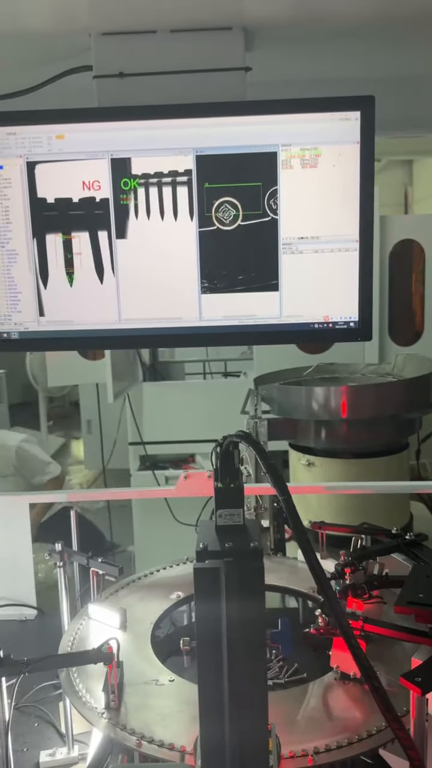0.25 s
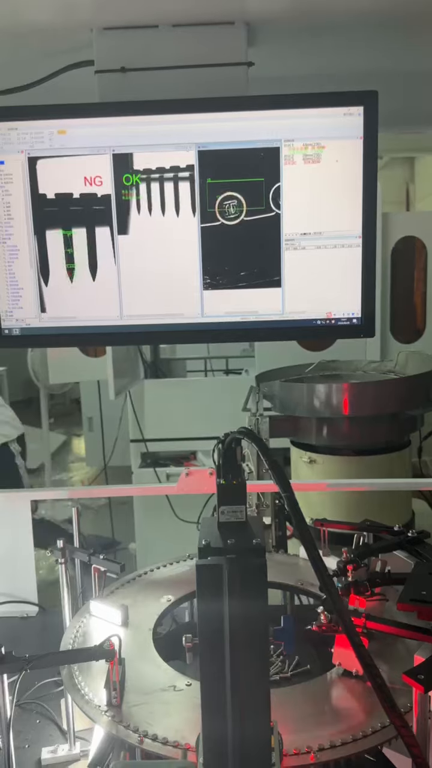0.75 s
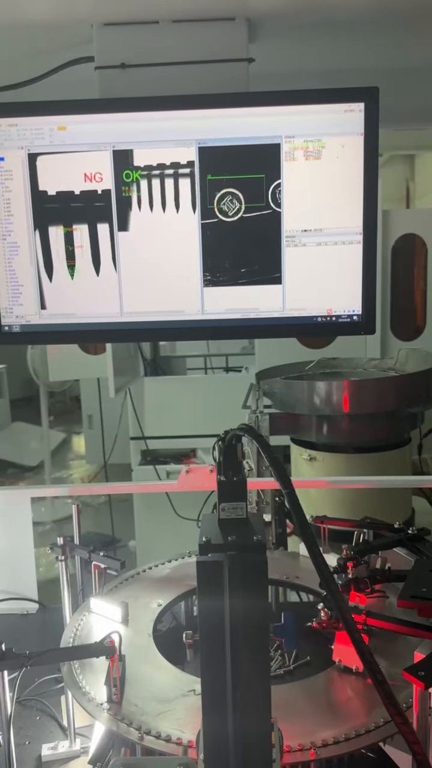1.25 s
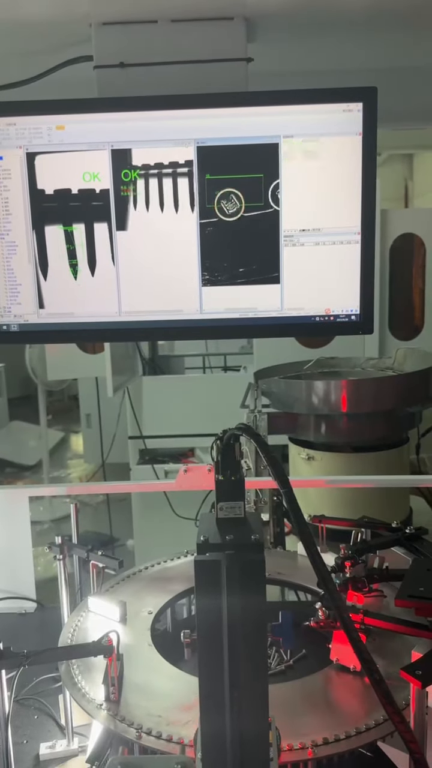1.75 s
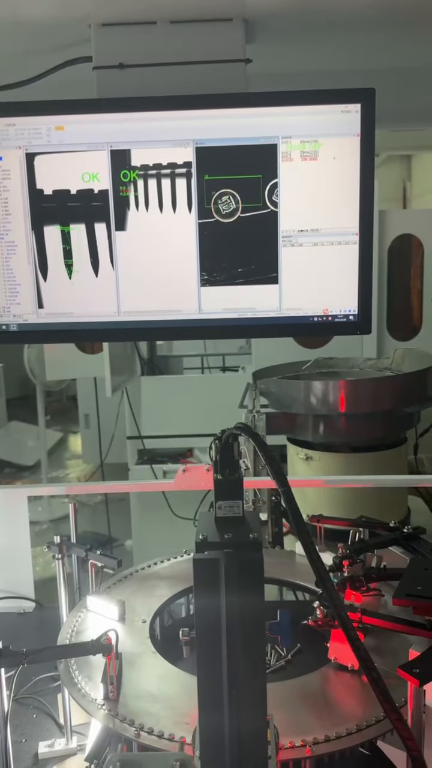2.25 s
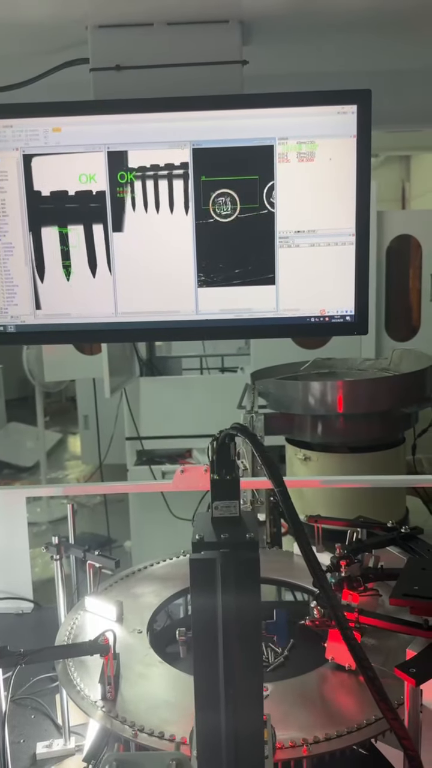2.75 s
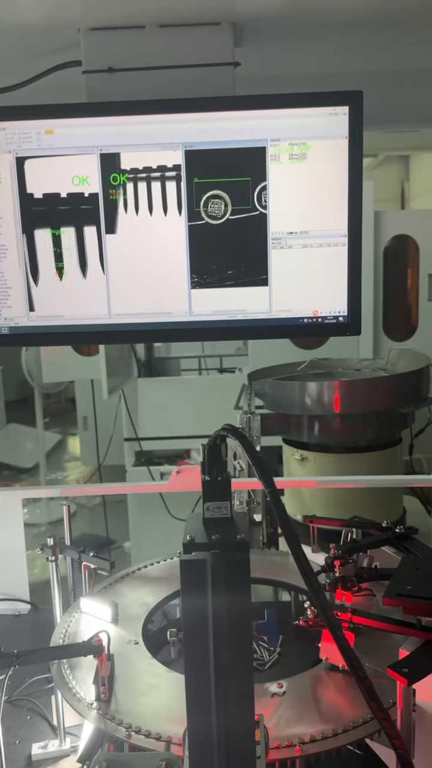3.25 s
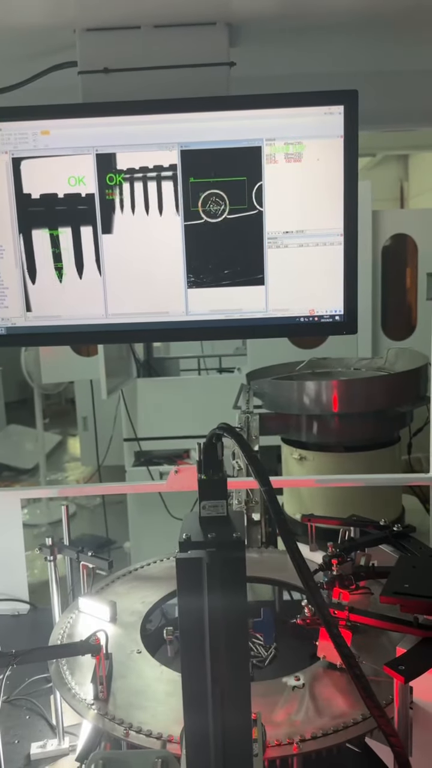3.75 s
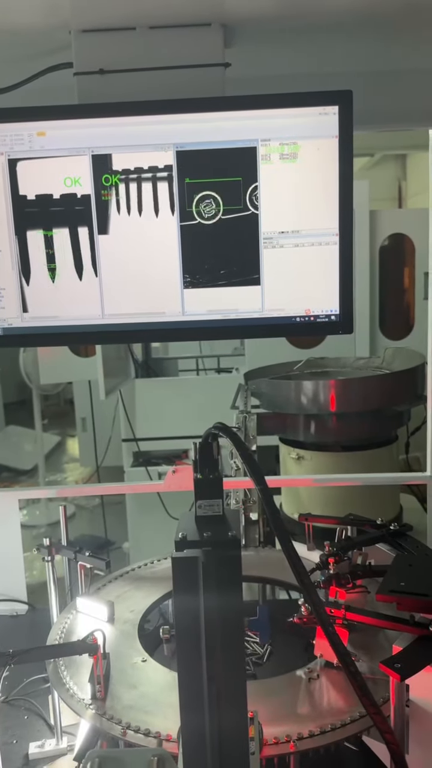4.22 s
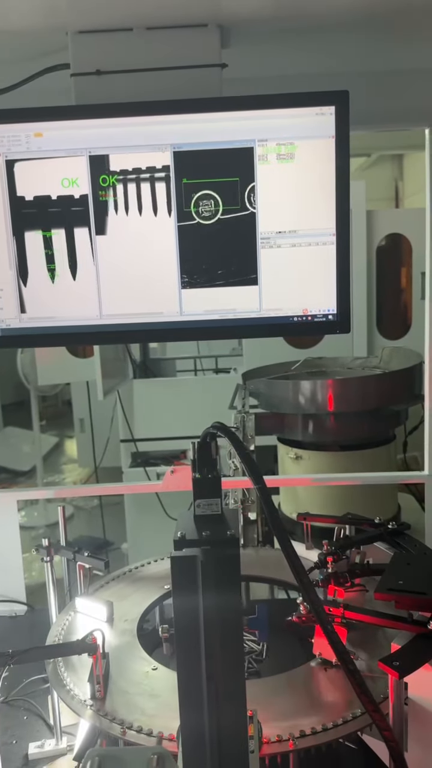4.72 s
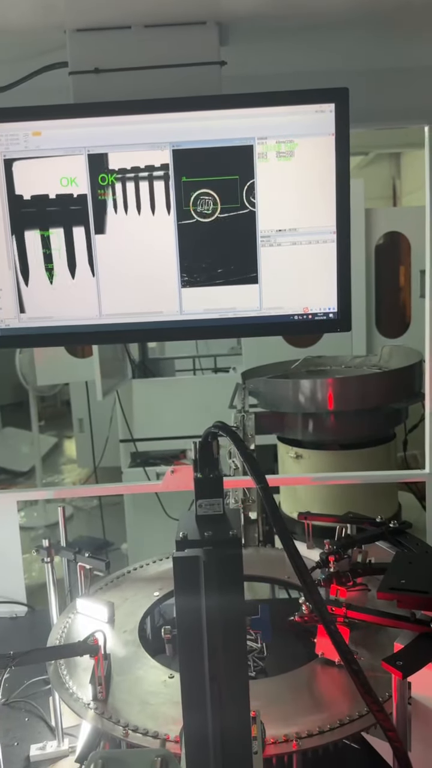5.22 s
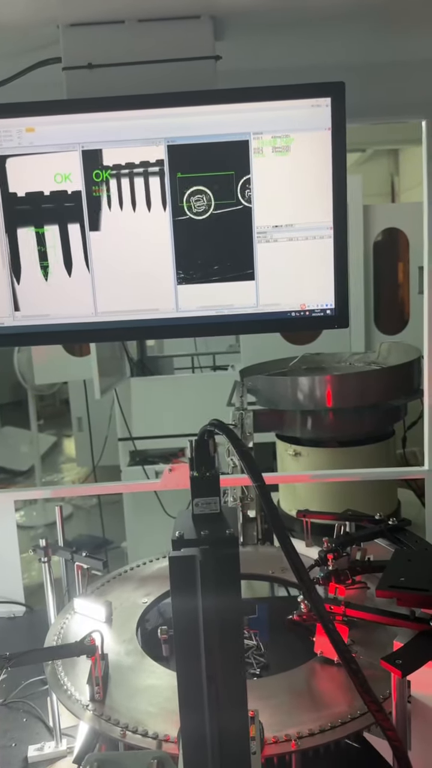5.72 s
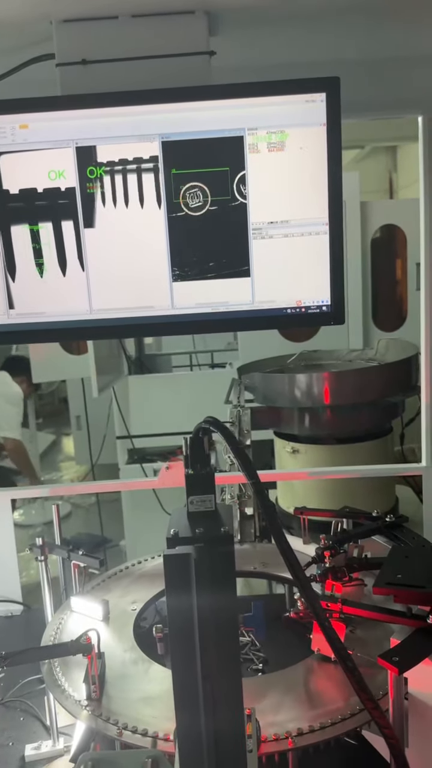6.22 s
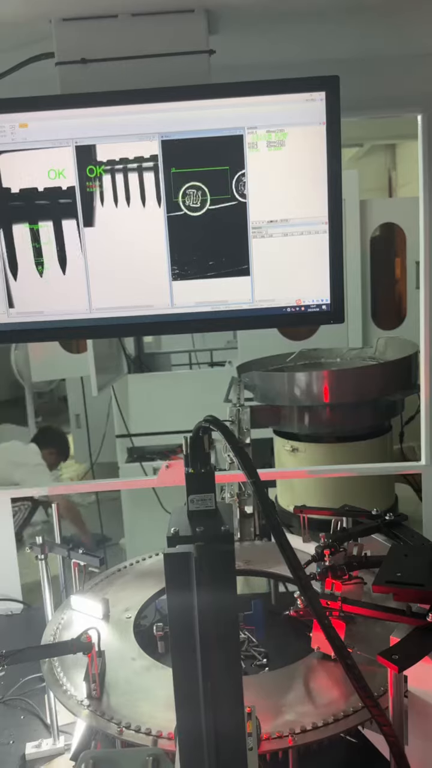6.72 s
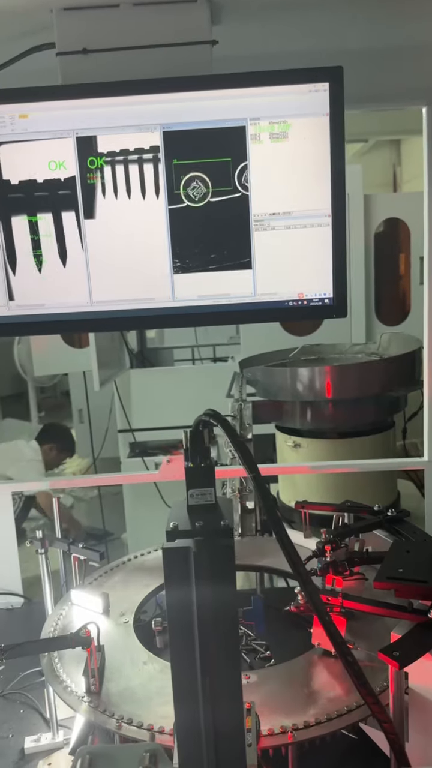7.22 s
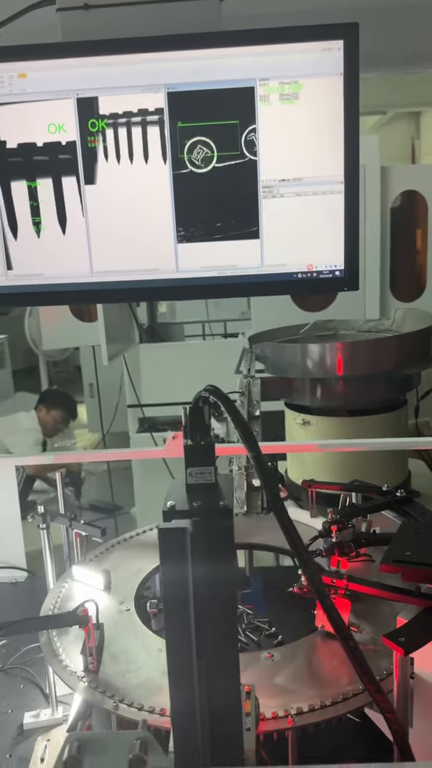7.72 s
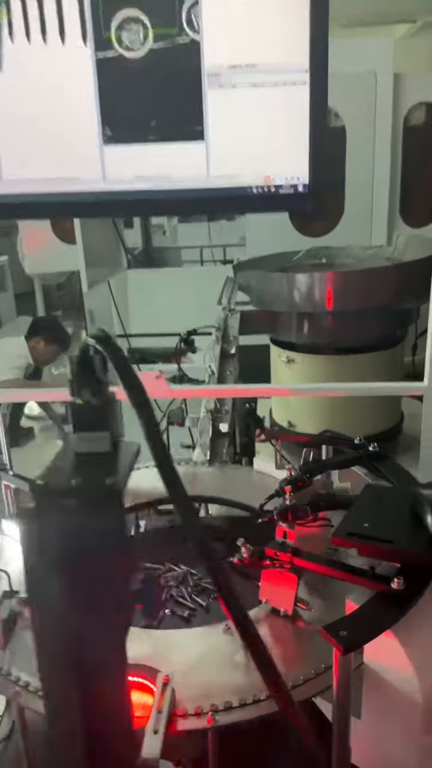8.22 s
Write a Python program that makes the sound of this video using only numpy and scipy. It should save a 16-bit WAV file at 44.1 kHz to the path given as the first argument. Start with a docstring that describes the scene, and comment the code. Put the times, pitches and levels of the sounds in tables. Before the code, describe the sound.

A close stereo sound of a nail sorting machine in a workshop with short reverberation. From 0 s a vibrating feeder bowl gives a deep hum around 60 Hz and dense bright rattle, dying away by about 0.5 s. Nails on the turning steel disc keep jostling with fine ticking, dropping into a chute about 6.6 times a second with tiny rebounds, hard clacks and short ringing notes. Sharp steel snaps stand out at 0.3-0.65, 1.8 and 2.45 s. Around 2.4-2.9 s the bowl surges back, louder, and stays to the end as a thick rattle, while disc ticking recedes. Hollow frame knocks come irregularly, notably near 0.6, 2.4, 3.7-4.2 and 6-7 s. High nail pings sing out at about 5, 6.5 and 8.2 s, where a hard drop lands. Steady airflow and slowly beating motor hum continue underneath, with low drones near 1, 5 and 5.7 s. Disc ticking rises again near 8.4 s.

```python
"""A workshop, close to a nail sorting machine. Nails jostle on a turning steel disc and drop into a chute
6.6 slots a second, with rebounds and hard drops; random contacts make the clatter, damped modes the ringing.
The vibrating feeder bowl dies down in the first half second and returns after two with a deep hum and a
dense rattle, both set by one drive curve. Motor tones and fan noise run throughout; low drones come and go.
"""
import sys
import numpy as np
from scipy import signal
from scipy.fft import rfft, irfft, next_fast_len
from scipy.io import wavfile
from scipy.ndimage import uniform_filter1d, map_coordinates

SR = 44100
rng = np.random.default_rng(int(sys.argv[2]) if len(sys.argv) > 2 else 0)


def unload_audio(sound):
    """Save the sound as a 16-bit wav file, at the path given as the first command line argument."""
    columns = np.transpose(np.atleast_2d(sound))
    # keep every value between -1 and 1, then stretch to whole-number steps
    steps = np.round(np.clip(columns, -1, 1) * 32767)
    wavfile.write(sys.argv[1], SR, steps.astype(np.int16))


N = 373527

# feeder magnet drive: [t/s, relative drive/dB]
FEEDER_DRIVE = [(0, 3), (.18, -1), (.45, -14), (2.3, -10), (2.55, 1.5), (2.9, 4.5)]
# feeder hum, vibration rate first: [f/Hz, level at 0 dB drive/dB]
FEEDER_TONES = [(61, -46.5), (122.2, -76)]
# jostling on the disc: [t/s, relative level/dB]
DISC_LEVEL = [(0, -26.5), (.5, -24), (1.2, -22), (1.8, -22), (2.3, -22.5), (2.8, -28.5), (4.8, -41),
              (7.2, -45), (8.47, -24)]


def amp(db):
    """Decibels to gain."""
    return 10 ** (np.asarray(db) / 20)


def unit(x):
    """Scale to rms 1."""
    return x / np.sqrt(np.mean(x ** 2) + 1e-20)


def along(points, hz):
    """Interpolate [f/Hz, value] points on a log frequency axis."""
    f, v = np.transpose(points)
    return np.interp(np.log(hz + 1), np.log(f + 1), v)


def curve(rows):
    """Interpolate [t/s, value] points at every sample."""
    return np.interp(np.arange(N) / SR, *np.transpose(rows))


def wobble(rate):
    """Smooth random curve, rate knots a second."""
    knots = rng.standard_normal(int(N * rate / SR) + 4)
    coarse = np.arange(0, N, 64)  # spline here, linear in between
    return np.interp(np.arange(N), coarse, map_coordinates(knots, [coarse * rate / SR]))


def filtered(x, response):
    """Filter x by a response given as a function of f/Hz."""
    m = next_fast_len(N + SR // 4, True)
    spectrum = rfft(x, m) * response(np.fft.rfftfreq(m, 1 / SR))
    return irfft(spectrum, m)[..., :N]


def coloured(x, spectrum):
    """Shape white x by a [f/Hz, dB] spectrum, keeping its power."""
    return filtered(x, lambda hz: unit(amp(along(spectrum, hz))))


def contacts(rate, spread_db):
    """Random tiny impacts, rms 1, each with its own size and mid/side share."""
    at = np.flatnonzero(rng.random(N) < rate / SR)
    size = rng.standard_normal(N)[at]
    place = 2 * np.pi * rng.random(N)[at]
    out = np.zeros((2, N))
    out[:, at] = amp(spread_db * size) * [np.cos(place), np.sin(place)]
    return unit(out)


def ringing(x, modes):
    """Damped [f/Hz, level/dB, width/Hz] resonances; white x of rms 1 drives each to its listed level."""
    def response(f):
        total = 0
        for centre, db, width in modes:
            resonance = 1j * f * width / (centre * centre - f * f + 1j * f * width)
            total = total + amp(db) * np.sqrt(SR / np.pi / width) * resonance
        return total
    return filtered(x, response)


def bursts(rows, t60):
    """Envelope of (t/s, level/dB, rise/s) bursts that swell and decay; their powers add."""
    power, t = np.zeros(N + SR), np.arange(SR // 2) / SR
    for s, db, rise in rows:
        swell = np.minimum(t / max(rise, 1 / SR), 1) ** .75
        shape = swell * amp(db - 60 * np.maximum(t - rise, 0) / t60)
        power[max(round(s * SR), 0):][:len(t)] += shape ** 2
    return np.sqrt(power[:N])


def tones(lines, drift_hz):
    """Sines of [f/Hz, rms/dB] whose pitch drifts slightly."""
    out = 0
    for hz, db in lines:
        phase = 2 * np.pi * np.cumsum(hz + drift_hz * wobble(2.06)) / SR
        out = out + amp(db) * np.sqrt(2) * np.sin(phase)
    return out


def mode(hz, unrest, rate=22):
    """One mode with a wandering phase (unrest/rad), as a mid/side pair in quadrature."""
    phase = 2 * np.pi * hz * np.arange(N) / SR + unrest * wobble(rate)
    return np.array([np.sin(phase), np.cos(phase)])


def struck(blows, modes, t60, spread_db):
    """Each (t/s, level/dB) blow rings the modes afresh, in its own random mix and direction."""
    hz, db = np.transpose(modes)
    t = np.arange(SR // 3) / SR
    fade = amp(-60 * t / t60) * (1 - np.exp(-t / .002))
    rings = np.exp(2j * np.pi * hz[:, None] * t) * fade
    luck = rng.standard_normal((len(blows), 5, len(hz)))
    weights = amp(db + spread_db * luck[:, -1:]) * (luck[:, :2] + 1j * luck[:, 2:-1])
    notes = (weights.reshape(-1, len(hz)) @ rings).real.reshape(len(blows), 2, -1)
    out = np.zeros((2, N + SR))
    for (s, blow_db), note in zip(blows, notes):
        out[:, max(round(s * SR), 0):][:, :len(t)] += amp(blow_db) * note
    return out[:, :N]


def jingling(x, depth_db):
    """Nails favour their own pitches for a few hundredths of a second: narrow patches of bounded gain."""
    full_depth_from_hz = 3000
    hz, _, z = signal.stft(x, SR, nperseg=768)
    reach = np.minimum(hz / full_depth_from_hz, 1)[:, None]
    field = uniform_filter1d(rng.standard_normal(z.shape[1:]), size=2, axis=0)
    field = uniform_filter1d(field, size=5, axis=1)
    gain = unit(amp(reach * depth_db * np.tanh(unit(field) / 2)))
    return signal.istft(z * gain, nperseg=768)[1][:, :N]


def room(x):
    """Diffuse reverberation; treble dies first; a fresh noise tail every eighth of a second keeps it even."""
    # decay time: [f/Hz, t60/s]
    decay_times = [(200, .55), (2000, .32), (8000, .12), (15000, .06)]
    out, step = np.zeros((2, N + SR)), SR // 8
    for start in range(0, N, step):
        hz, t, z = signal.stft(rng.standard_normal((2, SR // 3)), SR, nperseg=256)
        decay = amp(-60 * t / along(decay_times, hz)[:, None])
        tail = signal.istft(z * decay, SR, nperseg=256)[1]
        wet = signal.fftconvolve(x[:, start:start + step], tail / np.linalg.norm(tail[0]), axes=1)
        out[:, start:start + wet.shape[1]] += wet
    return out[:, :N]


def stereo(pair):
    """Mid/side to left/right, power kept: bass centred, side share set by frequency."""
    # width: [f/Hz, side re mid/dB]
    side_balance = [(60, -45), (210, -26), (330, -18), (520, -4), (770, -3.5), (1100, -12), (1800, -17),
                    (2150, -12), (2700, -5), (6400, -4), (8000, 1.5), (9500, 5), (10700, 24), (13600, 24),
                    (14700, 5.5)]

    def shares(hz):
        side = amp(along(side_balance, hz))
        return np.array([np.ones_like(side), side]) / np.hypot(1, side)
    mid, side = filtered(pair, shares)
    return np.array([mid + side, mid - side])


def fans():
    """Fan airflow: steady coloured noise."""
    # fan spectrum: [f/Hz, relative density/dB]
    fan_spectrum = [(20, -20), (40, -6), (70, -2), (140, 1.5), (220, -1.5), (330, -1), (520, -5.5),
                    (800, -6.5), (1400, -3.5), (4000, -3.5), (15000, -50)]
    return amp(-40.0) * coloured(rng.standard_normal((2, N)), fan_spectrum)


def hum():
    """Feeder magnet hum, two motors beating slowly and passing drones, alike at both ears."""
    # motor tones: [f/Hz, rms/dB]
    motor_tones = [(48.9, -57), (50.55, -51), (100, -64), (120, -62)]
    # low drones that come and go: [start/s, end/s, f/Hz, rms/dB]
    drone_rows = [(.72, 1.55, 75, -51.5), (1.8, 2.45, 75, -65), (4.92, 5.298, 74, -52), (5.4, 5.9, 76, -51),
                  (5.62, 5.898, 123.5, -49)]
    out = amp(curve(FEEDER_DRIVE)) * tones(FEEDER_TONES, drift_hz=0.068)
    for start, end, hz, db in drone_rows:
        swell = curve([(start - .05, 0), (start + .05, 1), (end - .05, 1), (end + .05, 0)])
        out = out + swell * tones([(hz, db)], drift_hz=0.31)
    return out + tones(motor_tones, drift_hz=0.31)


def knocks():
    """Hollow frame knocks: quickly damped bursts of band noise, each around its own pitch."""
    # knocks: [t/s, f/Hz, level/dB]
    knock_rows = [(.574, 900, -37), (1.365, 800, -44), (1.44, 750, -43), (2.125, 800, -44),
                  (2.37, 950, -36), (2.41, 450, -41), (3.675, 730, -38), (3.82, 750, -39),
                  (4.06, 1080, -38), (4.165, 1000, -36), (4.76, 850, -39), (5.955, 790, -39),
                  (6.52, 680, -38), (6.86, 880, -39)]
    rise_s, t60_s, relative_width = .006, .2, .7
    out = 0
    for s, hz, db in knock_rows:
        b, a = signal.iirpeak(hz, 1 / relative_width, SR)
        body = unit(signal.lfilter(b, a, rng.standard_normal((2, N))))
        out = out + bursts([(s, db, rise_s)], t60=t60_s) * body
    return out


def bowl(level_db, throb):
    """The bowl tosses its nails once per vibration and they ring its wall; more drive, more level."""
    # rattle spectrum: [f/Hz, relative density/dB]
    rattle_spectrum = [(150, -28), (370, -15), (520, -20), (650, -14), (800, -12.5), (1000, -11.5),
                       (1300, -12), (2800, -5.5), (3800, -4.2), (4700, -6.8), (6000, -1.8), (7300, 0),
                       (8400, -3.5), (9500, -2.5), (12700, -11), (14800, -1.5), (15700, -10)]
    # bowl wall modes: [f/Hz, relative level/dB, width/Hz]
    wall_modes = [(369, -41.5, 23), (628, -37, 22), (1187, -27.5, 35), (2787, -20.5, 40), (3855, -21, 120),
                  (4104, -24, 50), (7470, -27.5, 120)]
    toss = 1 + throb * np.sin(2 * np.pi * FEEDER_TONES[0][0] * np.arange(N) / SR)
    level = amp(level_db + curve(FEEDER_DRIVE) + 0.5 * wobble(14)) * toss
    rattle = coloured(level * contacts(rate=7000, spread_db=2), rattle_spectrum)
    wall = ringing(level * contacts(rate=2000, spread_db=-1.5), wall_modes)
    return jingling(rattle + wall, depth_db=6.5)


def disc():
    """Nails tick against each other and the disc rim: dense random contacts, coloured."""
    # ticking spectrum: [f/Hz, relative density/dB]
    tick_spectrum = [(400, -23), (1000, -12), (1500, -7), (2300, 1.5), (3100, -10), (3700, 3.5), (4500, -2),
                     (6800, 5), (8400, 1), (9500, 4), (12400, -4), (14800, 4), (15700, -3)]
    level = amp(curve(DISC_LEVEL) + 0.8 * wobble(22))
    return coloured(amp(-5.2) * level * contacts(rate=6000, spread_db=2), tick_spectrum)


def taps(bowl_db):
    """Rows (t/s, level/dB): stray nails tap the steel at random, as hard as disc and bowl shake them."""
    taps_per_s, tap_db, spread_db = 45, -10.5, 4.2  # tap_db is relative to the bed
    bed_power = amp(curve(DISC_LEVEL)) ** 2 + amp(bowl_db + curve(FEEDER_DRIVE)) ** 2
    bed_db = 10 * np.log10(bed_power)
    at = np.flatnonzero(rng.random(N) < taps_per_s / SR)
    level_db = bed_db[at] + tap_db + spread_db * rng.standard_normal(len(at))
    return list(zip(at / SR, level_db))


def snaps(t60):
    """Hard steel-on-steel hits: short bright noise bursts."""
    # snaps: [t/s, relative level/dB]
    snap_rows = [(.341, -18), (.485, -16.5), (.643, -18.5), (1.782, -19.5), (2.002, -28), (2.456, -23),
                 (6.172, -23), (8.36, -21.5)]
    # snap spectrum: [f/Hz, relative density/dB]
    snap_spectrum = [(1500, -24), (4000, -12), (7000, -5), (10000, -2), (12000, -2), (14500, 0),
                     (16000, -4)]
    snap = bursts([(s, db, .002) for s, db in snap_rows], t60=t60)
    return coloured(np.sqrt(2) * snap * rng.standard_normal((2, N)), snap_spectrum)


def free_nails(unrest):
    """A nail that bounces clear rings on one high, wavering, decaying note."""
    # free rings: [t/s, f/Hz, relative level/dB, t60/s]
    ring_rows = [(.342, 6480, -27, .2), (.4, 7214, -31, .2), (.485, 9850, -23, .06),
                 (.485, 10150, -23, .06), (.58, 7946, -31, .2), (.643, 6600, -30, .16),
                 (1.5, 7429, -29, .2), (1.5, 9281, -30, .15), (1.655, 7946, -29, .2), (2.03, 6804, -27, .2),
                 (2.245, 7257, -29, .2), (2.32, 6804, -29, .2), (3.472, 7946, -27, .2),
                 (4.957, 7429, -22.5, .2), (5.575, 6481, -26, .2), (5.892, 5965, -28, .2),
                 (6.028, 6481, -27, .2), (6.34, 5040, -31, .3), (6.503, 7429, -25, .2),
                 (7.845, 7494, -25, .2), (8.208, 6660, -19.5, .16), (8.362, 10680, -25, .16),
                 (8.37, 6680, -26, .16)]
    out, t = np.zeros((2, N + SR)), np.arange(SR // 3) / SR
    for s, hz, db, t60 in ring_rows:
        phase = 2 * np.pi * hz * t + unrest * wobble(170)[:len(t)]
        fade = amp(db - 60 * t / t60) * (1 - np.exp(-t / .001))
        note = np.array([np.sin(phase), np.cos(phase)])
        out[:, round(s * SR):][:, :len(t)] += np.sqrt(2) * fade * note
    return out[:, :N]


def landings():
    """Rows (t/s, clatter/dB, rise/s, chute/dB): slots drop nails that rebound; hard drops replace near ones."""
    # hard drops: [t/s, relative clatter/dB, relative chute ring/dB]
    hard_rows = [(0.066, -24, -54), (.12, -24, -41), (.201, -28.5, -48), (0.282, -23.5, -42),
                 (.397, -23, -48), (.575, -22, -43), (0.718, -23.5, -43), (.742, -25, -50),
                 (.874, -23, -41.5), (.945, -28.5, -51), (1.015, -26, -59), (1.057, -24.5, -51),
                 (1.12, -29, -52), (1.19, -23.5, -39), (1.261, -21, -43), (1.341, -24, -44),
                 (1.404, -25, -48), (1.496, -21, -44), (1.555, -29, -50), (1.647, -25, -40),
                 (1.715, -27, -50), (1.852, -25.5, -40), (1.939, -21, -40), (2.021, -22.5, -45),
                 (2.082, -20.5, -41), (2.165, -26.5, -49), (2.236, -21, -42), (2.314, -23.5, -58),
                 (2.39, -23.5, -39), (2.452, -20.5, -55), (2.551, -27.5, -37), (2.705, -22, -40.5),
                 (2.766, -25.5, -50), (2.888, -22.5, -44), (3.005, -21.5, -36.5), (3.157, -25.5, -51),
                 (3.302, -21, -46), (3.469, -22.5, -38), (3.633, -21, -55), (3.78, -26, -45),
                 (3.927, -23, -46), (4.06, -25, -48), (4.226, -22, -41.5), (4.372, -25.5, -40),
                 (4.505, -31, -43), (4.606, -23.5, -46), (4.73, -26, -50), (4.826, -20.5, -48),
                 (4.895, -23, -48), (4.954, -25, -48), (5.142, -25, -38.5), (5.281, -31, -42),
                 (5.371, -27.5, -50.5), (5.428, -25, -41), (5.573, -21.5, -42), (5.73, -27.5, -38),
                 (5.888, -21.5, -33), (6.026, -23.5, -35.5), (6.174, -33, -44), (6.344, -25, -36),
                 (6.501, -24, -38.5), (6.639, -31, -41), (6.77, -21, -50.5), (6.942, -22.5, -37),
                 (7.073, -22, -48), (7.225, -23.5, -47), (7.392, -22, -55), (7.572, -22, -50),
                 (7.697, -20, -44), (7.841, -21.5, -49), (7.99, -22, -44), (8.171, -18, -47.5),
                 (8.361, -25, -46), (8.448, -22, -46)]
    slots_per_s, first_slot_s = 6.6, .112
    drop_db, chute_db, hard_rise_s = -33.5, -46.5, 0.007
    scatter_s, scatter_db = 0.0077, 1
    # first landing and rebound: lag/s, clatter/dB, chute/dB, rise/s, scatter factor
    strikes = [(0, 0, 0, 0.011, 1), (.07, -6, -3.5, 0.0068, 2.3)]
    slots = np.arange(first_slot_s, N / SR, 1 / slots_per_s)
    chance = rng.standard_normal((len(slots), 2, 2))
    rows = [(s, db, hard_rise_s, chute_ring_db) for s, db, chute_ring_db in hard_rows]
    hard_s = np.array(hard_rows)[:, 0]
    for slot, draws in zip(slots, chance):
        for (lag, softer, duller, rise, scatter), (late, size) in zip(strikes, draws):
            s = slot + lag + scatter * scatter_s * late
            db = scatter * scatter_db * size
            if np.abs(hard_s - slot - lag).min() > .3 / slots_per_s:
                rows.append((s, drop_db + softer + db, rise, chute_db + duller + db))
    return rows


def flurries(falls):
    """Strike envelope of the falling nails."""
    return bursts([(s, db, rise) for s, db, rise, _ in falls], t60=0.15)


def drops(strike):
    """Each drop is a quick flurry of contacts under the strike envelope."""
    # drop spectrum: [f/Hz, relative density/dB]
    drop_spectrum = [(500, -30), (1400, -19), (2400, -11), (3700, -6), (4800, -7), (6200, -1.5), (7700, -1),
                     (8500, -4), (9400, -1), (10600, -3), (12300, -8), (15500, -9)]
    return coloured(amp(2.6) * strike * contacts(rate=16000, spread_db=0), drop_spectrum)


def singing_modes(falls, unrest, flutter_db):
    """Every drop swells the disc's clearest modes; a nail catching an edge makes one sing out."""
    # clearest disc modes: [f/Hz, level re drop clatter/dB]
    singer_rows = [(1100, -25.5), (1890, -40), (2132, -18), (2522, -16.5), (2959, -23.5), (3225, -29),
                   (3537, -30), (4019, -23), (5641, -19)]
    # nails catching an edge: [t/s, mode f/Hz, relative level/dB]
    ping_rows = [(.01, 2522, -32), (.1, 2132, -29.5), (.13, 2522, -30), (.27, 4019, -30), (.43, 1100, -42),
                 (.77, 1100, -52), (.89, 2132, -33), (1.0, 1100, -45), (1.17, 2522, -35), (1.33, 2132, -33),
                 (1.52, 2132, -32), (1.66, 2132, -31), (1.8, 2132, -33), (1.95, 2132, -34),
                 (2.01, 1100, -34.5), (2.23, 2132, -35), (2.36, 4019, -29), (2.38, 2132, -33),
                 (2.39, 1100, -45), (2.53, 2132, -33), (2.65, 4019, -33), (.58, 5641, -33),
                 (1.35, 5641, -32), (2.69, 5641, -28.5), (2.87, 2132, -34), (2.98, 2132, -28),
                 (3.28, 4019, -33), (3.29, 2132, -29), (3.44, 2522, -30), (3.62, 2132, -44),
                 (3.75, 2132, -30), (3.91, 4019, -29.5), (4.04, 1100, -41.5), (4.21, 2522, -31.5),
                 (4.34, 4019, -29), (4.36, 2522, -28.5), (4.611, 2959, -33), (4.67, 4019, -29),
                 (4.77, 2959, -26.5), (4.8, 2132, -40), (4.82, 4019, -39), (5.41, 2132, -38),
                 (5.56, 2522, -31), (5.71, 2522, -31), (5.85, 1100, -37), (5.92, 2132, -36),
                 (6.04, 2132, -33), (6.3, 2132, -32), (6.45, 2959, -32.5), (6.62, 2522, -29),
                 (6.63, 3537, -26), (6.92, 2522, -33), (7.05, 2959, -31), (7.38, 4019, -29),
                 (7.86, 3225, -28), (8.08, 2522, -28), (8.2, 1890, -32), (8.21, 2959, -26),
                 (8.361, 1890, -34)]
    swell_rise_s, swell_t60_s = .015, .8
    ping_rise_s, ping_t60_s = .02, .54
    swell = bursts([(s, db, swell_rise_s) for s, db, _, _ in falls], t60=swell_t60_s)
    out = 0
    for hz, db in singer_rows:
        pings = [(s, ping_db, ping_rise_s) for s, ping_hz, ping_db in ping_rows
                 if abs(ping_hz / hz - 1) < .04]
        caught = bursts(pings, t60=ping_t60_s)
        swollen = swell * amp(db + flutter_db * wobble(21))
        out = out + np.hypot(swollen, caught) * mode(hz, unrest)
    return out


def chute(falls, level_db, unrest):
    """The chute answers each landing with a short note; the spot hit favours one mode or another."""
    # chute modes: [f/Hz, relative level/dB, width/Hz]
    chute_modes = [(1682, -6.5, 28), (1724, -3, 28), (1808, -6.5, 28)]
    rise_s, t60_s, spread_db = 0.023, 0.26, 3
    favour = rng.standard_normal((len(falls), len(chute_modes)))
    out = 0
    for (hz, mode_db, width_hz), luck in zip(chute_modes, favour.T):
        blows = [(s, db + spread_db * k, rise_s) for (s, _, _, db), k in zip(falls, luck)]
        envelope = amp(level_db + mode_db) * bursts(blows, t60=t60_s)
        out = out + envelope * mode(hz, unrest, rate=width_hz)
    return out


def scene():
    """Nails, bowl and knocks with their room sound, plus singing steel, fans and hum."""
    # nail modes: [f/Hz, relative level/dB]
    nail_modes = [(5680, -16), (5860, -17), (5965, -15), (6100, -16), (6260, -16), (6481, -13), (6654, -17),
                  (6804, -13), (6920, -16), (7214, -15), (7429, -13), (7494, -13), (7640, -13), (7946, -14),
                  (8290, -18), (8979, -18), (9260, -16), (9367, -17), (9570, -17), (9927, -18),
                  (10320, -16)]
    # disc and guide modes: [f/Hz, relative level/dB]
    steel_modes = [(2029, -20), (2335, -19.5), (2474, -18), (2572, -21), (2959, -20), (2993, -18.5),
                   (3225, -20), (3290, -20), (3537, -21), (3720, -20), (3925, -18), (3965, -19),
                   (4019, -19), (4110, -20), (4597, -21), (4770, -18.5), (4930, -21), (5045, -17),
                   (5325, -18), (5641, -17), (5674, -16.5)]
    # how freely the sheet metal rings: [t/s, gain/dB]
    steel_freedom = [(0, 0), (2.4, 1), (3, 0), (6.2, 0), (7.2, -1.5), (8.47, -2)]
    falls = landings()
    blows = [(s, db) for s, db, _, _ in falls] + taps(bowl_db=-26)
    nails = jingling(disc() + drops(flurries(falls)), depth_db=8.5)
    nails = nails + amp(-2.5) * struck(blows, nail_modes, t60=.17, spread_db=3)
    metal = nails + bowl(level_db=-26.9, throb=0.1) + knocks()
    metal = metal + snaps(t60=.07) + free_nails(unrest=.4)
    steel = amp(-2.3) * struck(blows, steel_modes, t60=.3, spread_db=3)
    steel = steel + singing_modes(falls, unrest=.35, flutter_db=2)
    singing = amp(curve(steel_freedom)) * steel + chute(falls, level_db=5.2, unrest=1.5)
    return stereo(metal + amp(-8.0) * room(metal) + singing + fans()) + hum()


def record(dry):
    """Band limit: nothing passes from 15650 Hz up."""
    top_hz = 15650
    return filtered(dry, lambda hz: hz < top_hz)


dry = scene()
out = record(dry)
unload_audio(out)
```